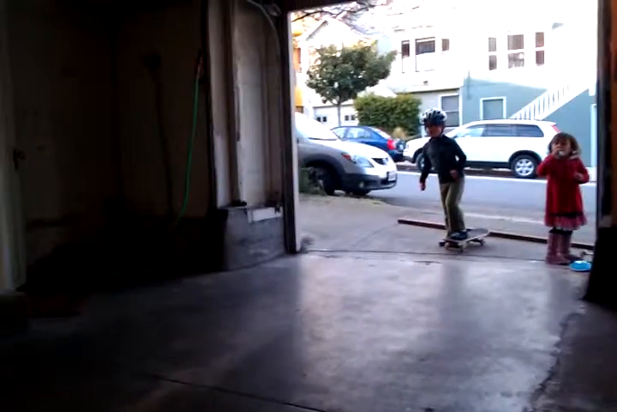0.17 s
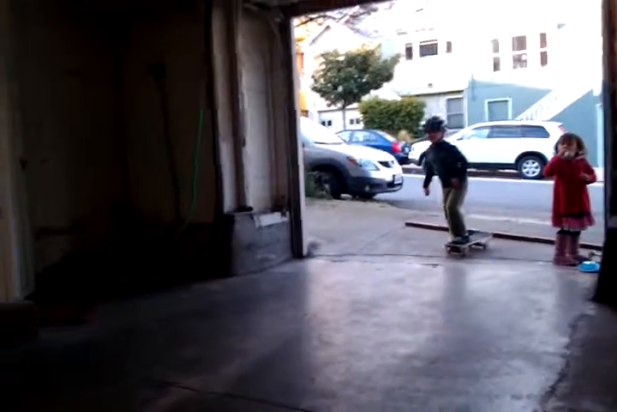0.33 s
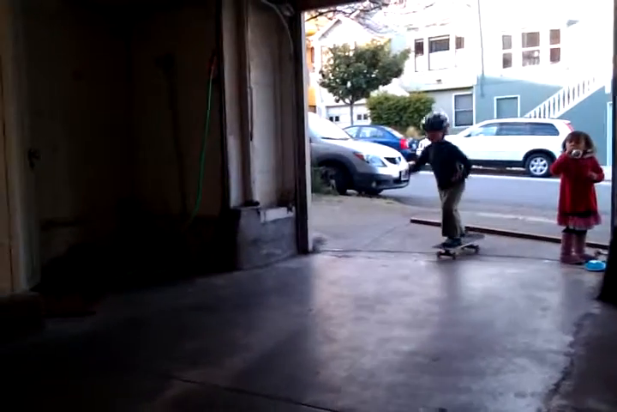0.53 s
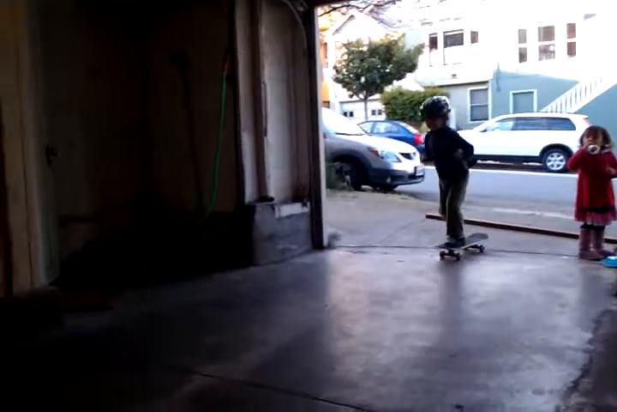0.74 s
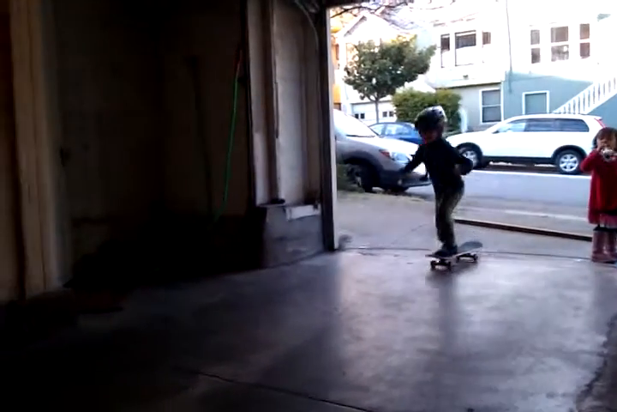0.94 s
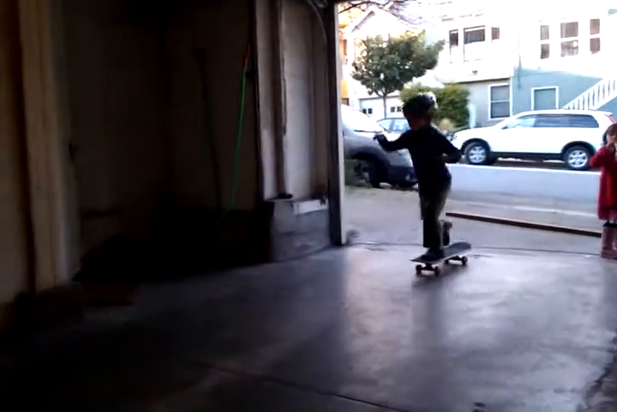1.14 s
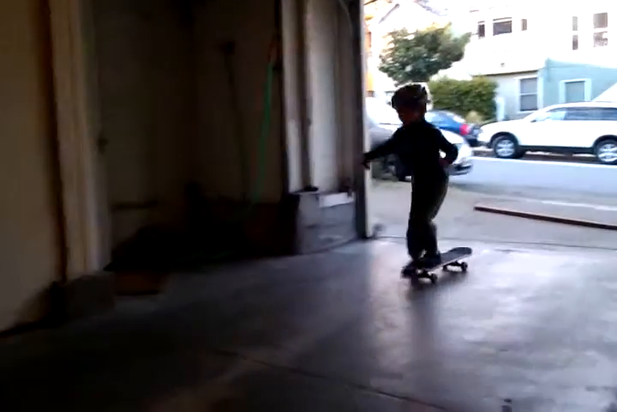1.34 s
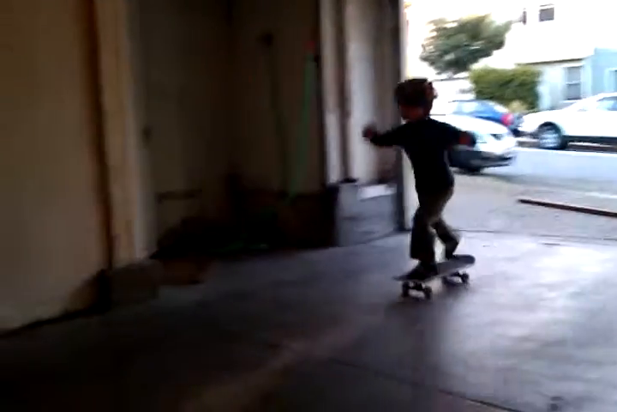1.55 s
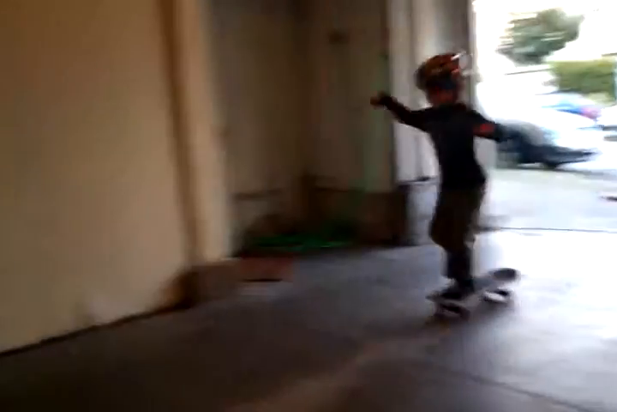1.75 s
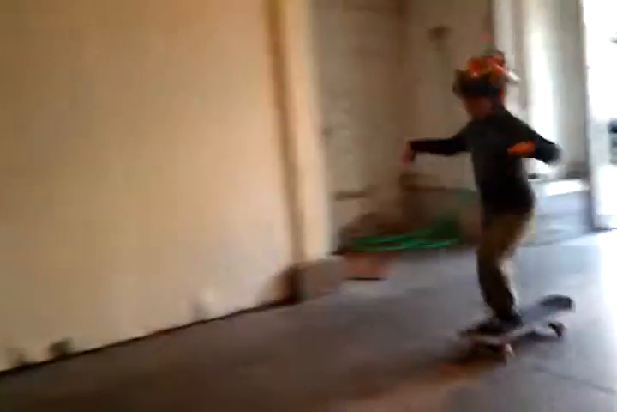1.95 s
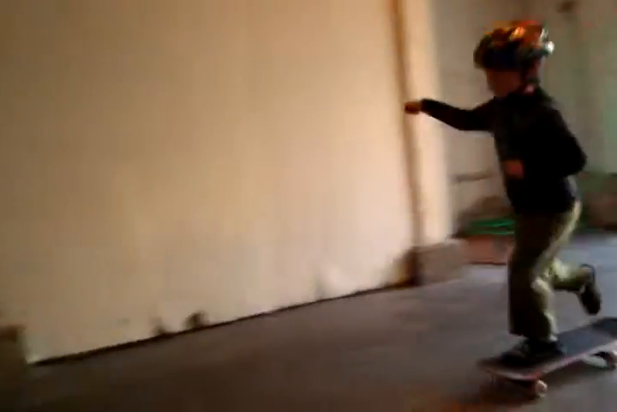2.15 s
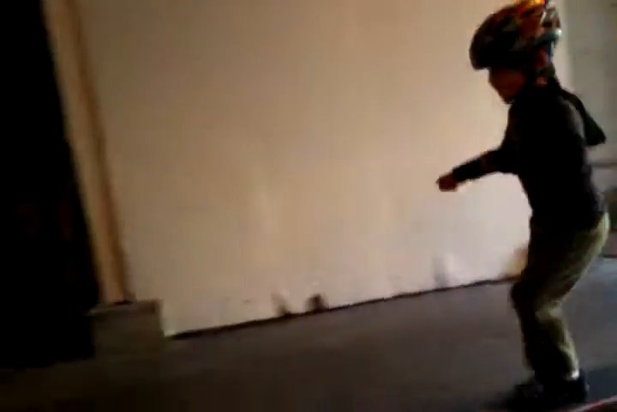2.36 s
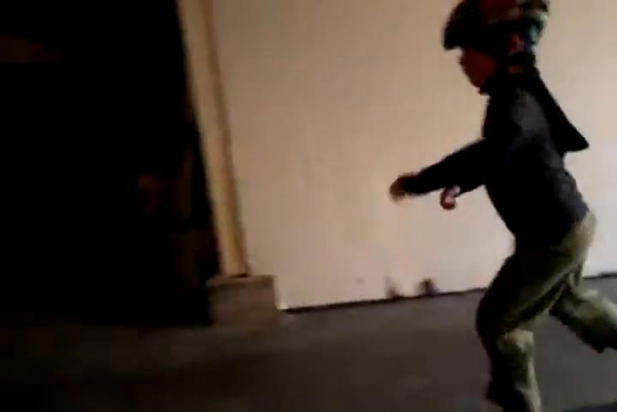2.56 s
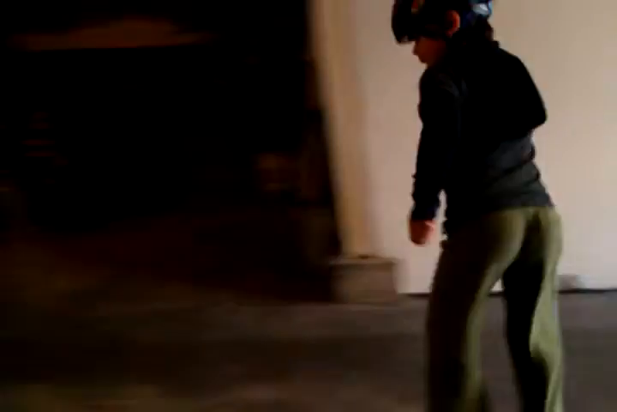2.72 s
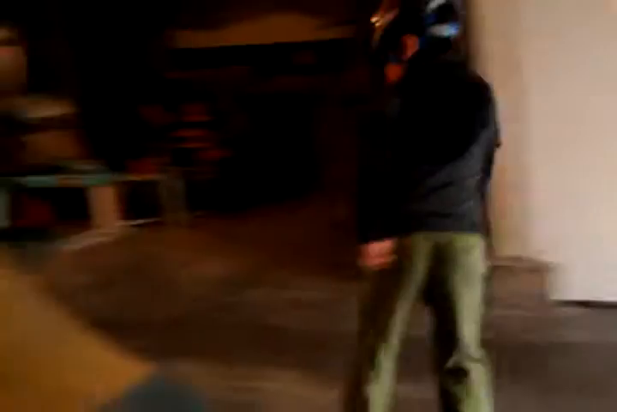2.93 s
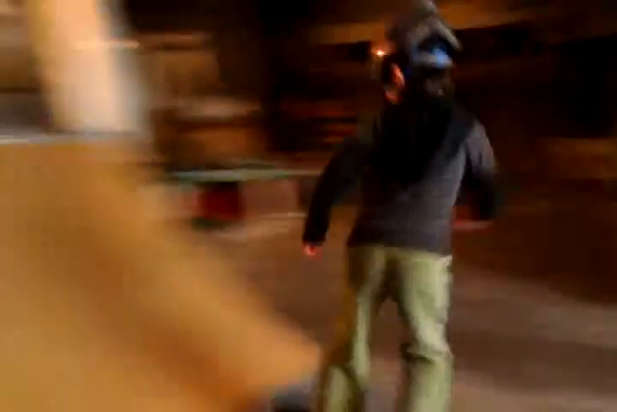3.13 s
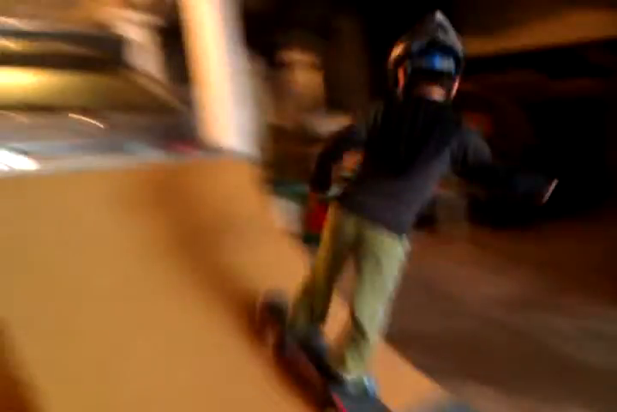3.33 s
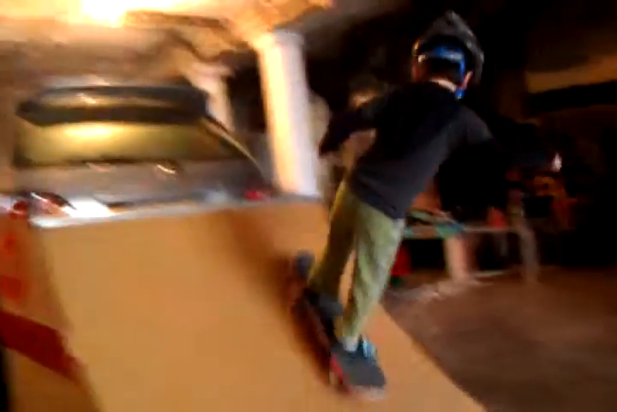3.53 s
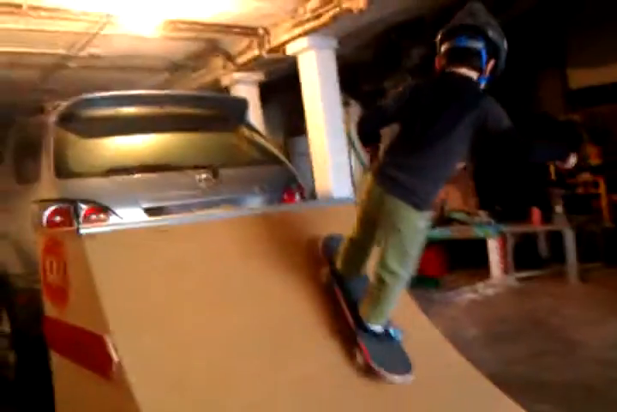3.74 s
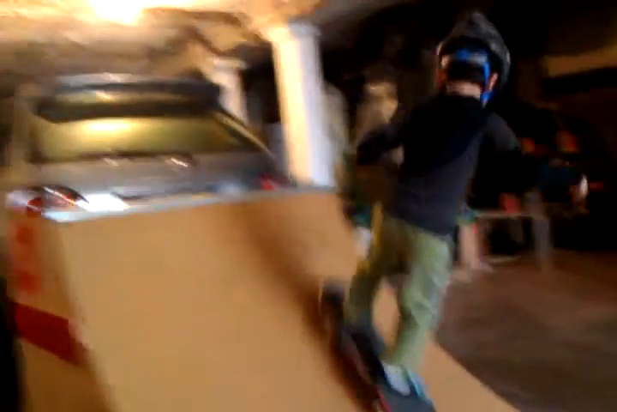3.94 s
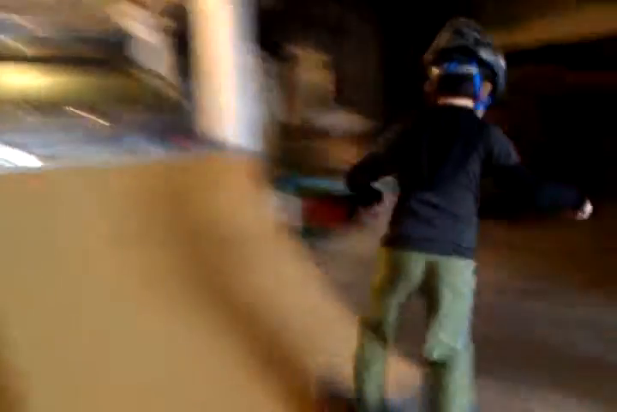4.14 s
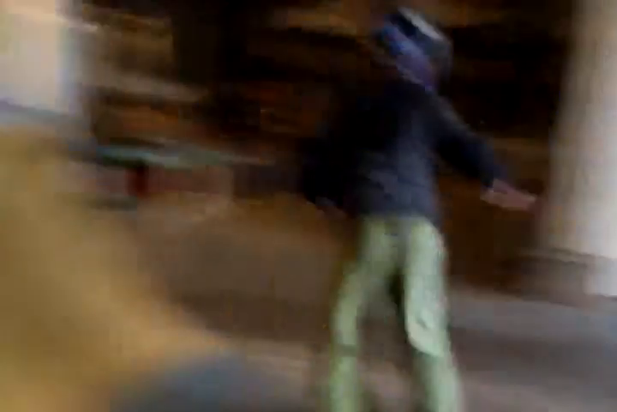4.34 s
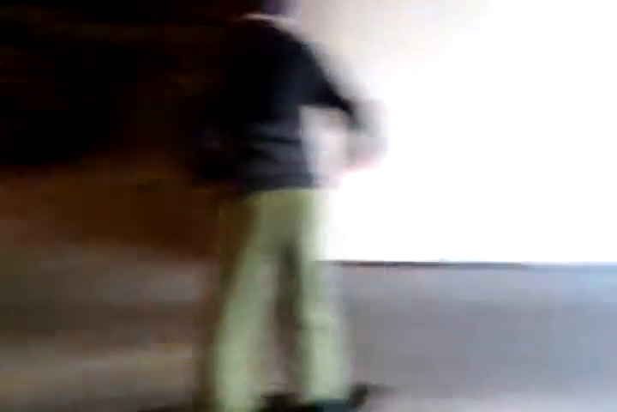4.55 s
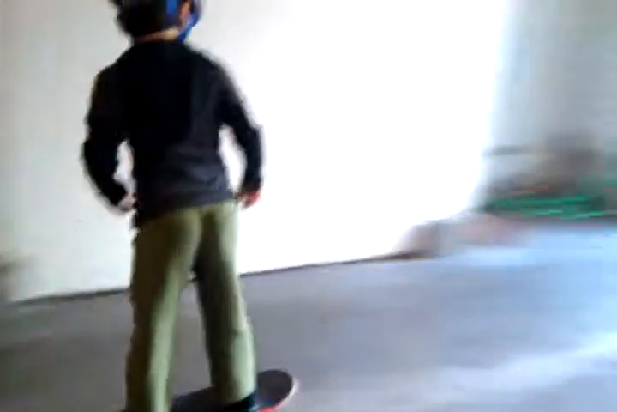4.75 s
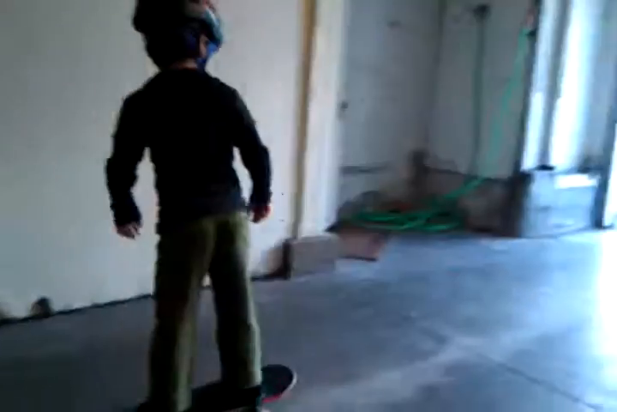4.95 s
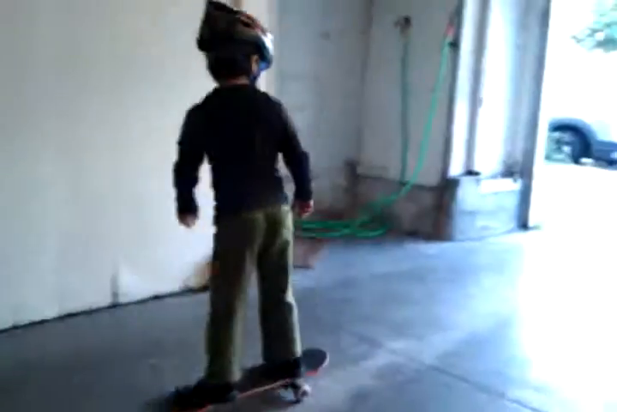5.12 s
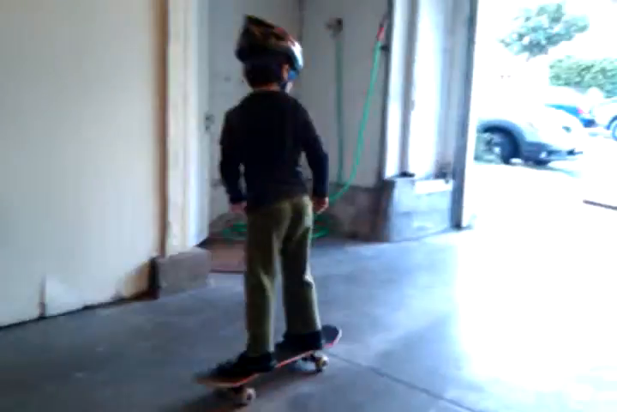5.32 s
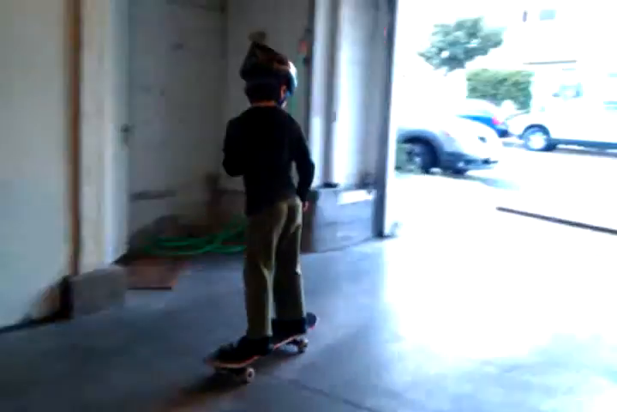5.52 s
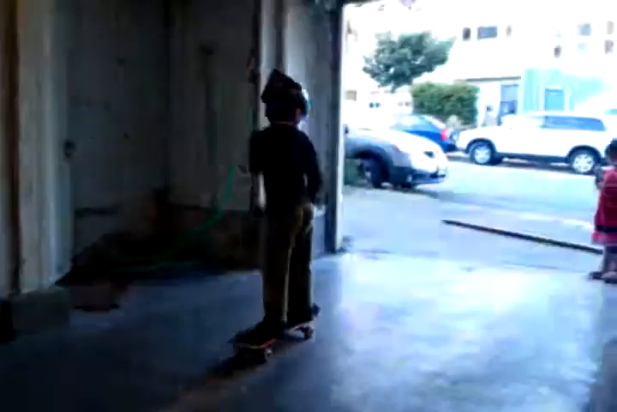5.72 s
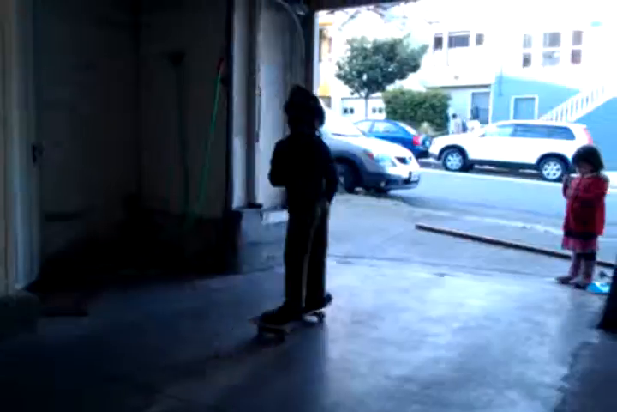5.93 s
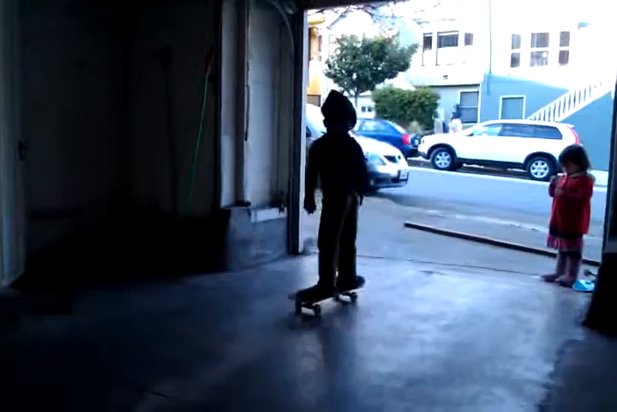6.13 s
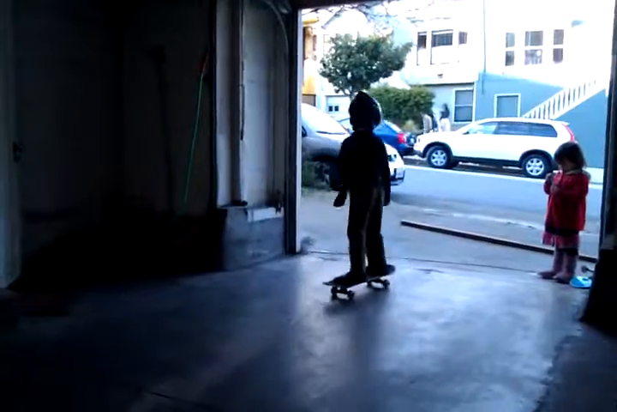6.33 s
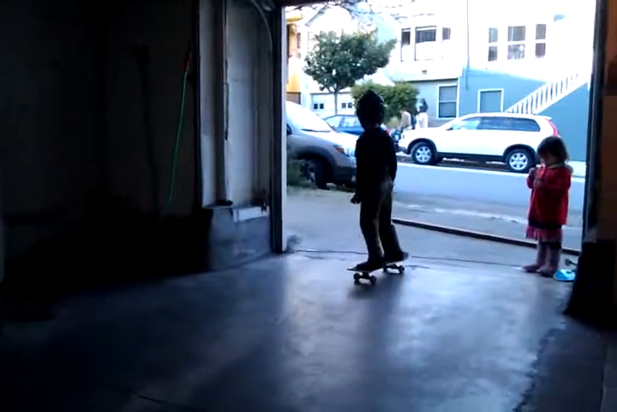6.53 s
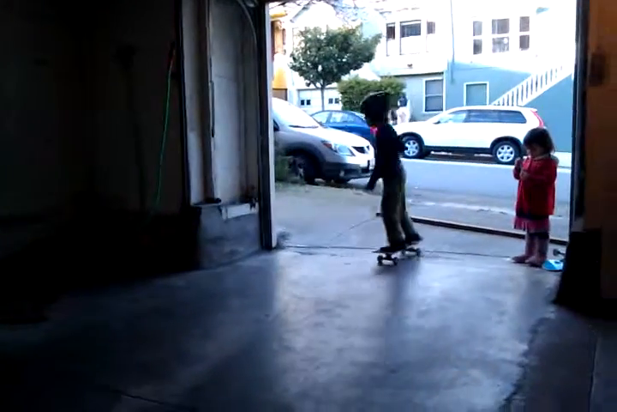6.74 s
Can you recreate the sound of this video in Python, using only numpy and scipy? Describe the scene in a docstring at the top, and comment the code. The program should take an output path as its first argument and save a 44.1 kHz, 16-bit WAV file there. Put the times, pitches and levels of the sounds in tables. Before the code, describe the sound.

In an echoing concrete garage open to a quiet street, a skateboard approaches with soft ticks that grow into hard knocks and gritty rolling. It hits a hollow plywood ramp in a very loud, distorted burst of bangs, pauses, clatters back down, then rolls away with scattered clacks. Narrow, phone-like microphone that overloads.

```python
"""Soft knocks over a low street murmur, then a child's skateboard rolls over rough concrete in a garage,
past a phone, up a plywood ramp that clatters twice, and back out.
Random grit excites the resonances of deck, trucks and the air under the board; short bursts make the
cracks knock. Chatter and slams drive the ramp's wood modes and its metal lip. A tanh overload, a
telephone band and hard clipping end the chain."""
import sys
import numpy as np
from scipy import signal
from scipy.io import wavfile
from scipy.ndimage import uniform_filter1d

SR = 44100
rng = np.random.default_rng(int(sys.argv[2]) if len(sys.argv) > 2 else 0)


def pcm_store(signal):
    """Save signal as 16-bit PCM."""
    levels = np.round(np.clip(np.atleast_2d(signal), -1, 1) * 32767)
    wavfile.write(sys.argv[1], SR, levels.astype(np.int16).T)


N = 298998  # length in samples


def gain_of(db):
    """Decibel law: an amplitude ratio is 10 to the power dB / 20."""
    return 10 ** (np.asarray(db) / 20)


def evened(x):
    """Normalisation: scales a signal to an rms of 1."""
    return x / np.sqrt(np.mean(x ** 2) + 1e-20)


def add(mix, start_s, sound):
    """Superposition: sums a sound into the mix in place, cut at the end of the mix."""
    part = mix[round(start_s * SR):][:len(sound)]
    part += sound[:len(part)]


def colour(x, points):
    """Minimum-phase filtering: the log gain fixes the phase, so the response starts at once."""
    table_hz, db = np.transpose(points)
    hz = abs(np.fft.fftfreq(8192, 1 / SR))
    level_db = np.interp(np.log(hz + 1), np.log(table_hz + 1), db, left=min(db[0], -24))
    log_gain = level_db * np.log(10) / 20
    response = np.exp(np.conj(signal.hilbert(log_gain)))
    taps = np.fft.ifft(response).real[:4096]
    return signal.oaconvolve(x, taps)[:len(x)]


def resonate(x, hz, width_hz):
    """Heterodyned resonance: shifts hz down to zero, smooths, and shifts back, with a peak gain of 1."""
    turn = np.exp(2j * np.pi * hz * np.arange(len(x)) / SR)
    r = np.exp(-np.pi * width_hz / SR)
    smooth = signal.lfilter([1 - r], [1, -r], x / turn)
    return 2 * (turn * smooth).real


def ring(x, modes, centre_hz, spread):
    """Modal superposition: a panel's modes near centre_hz speak most, as a blow lands at one spot."""
    out = np.zeros(len(x))
    for k, (hz, width_hz, db) in enumerate(modes):
        r = np.exp(-np.pi * width_hz / SR)
        near = np.exp(-(np.log(hz / centre_hz) / spread) ** 2)
        mode = signal.lfilter([1 - r], [1, -r * np.exp(2j * np.pi * hz / SR)], x).real
        out += (-1) ** k * near * gain_of(db) * 2 * mode  # signs alternate from mode to mode
    return out


def grit(count, per_s, spread_db):
    """Shot noise: random clicks of uneven size, as wheels meet grains of stone."""
    size_db = spread_db * np.minimum(rng.exponential(1, count), 5)
    size = gain_of(size_db) * rng.choice([-1., 1.], count)
    return evened(size * (rng.random(count) < per_s / SR))


def lumps(count, lasts_s, depth_db):
    """Random amplitude modulation: twice-smoothed noise moves the level over about lasts_s."""
    width = round(lasts_s * SR)
    slow = uniform_filter1d(uniform_filter1d(rng.standard_normal(count), width), width)
    return gain_of(depth_db * evened(slow))


# spectrum of the street noise: pitch_hz, relative density_db (per Hz)
STREET = [(18, -51), (30, -41), (154, -23), (285, -8.5), (329, -24.5), (647, -19.5), (1350, -20),
          (1470, -16), (4000, -43.5), (5200, -56.5), (8800, -120)]
# spectrum of floor-borne bass, also under the board and ramp: pitch_hz, relative density_db (per Hz)
RUMBLE = [(20, -1.5), (60, 4.5), (120, 12.5), (200, -11.5), (400, -41.5)]


def street():
    """Stationary noise: the street through the open door, with bass borne by the floor."""
    air, floor = rng.standard_normal((2, N))
    return gain_of(-61.5) * evened(colour(air, STREET)) + gain_of(-55.0) * evened(colour(floor, RUMBLE))


# reverberation time of the garage: pitch_hz, t60_s
GARAGE_DECAY = [(100, 0.47), (400, 0.31), (1500, 0.66), (3500, 0.5)]


def garage(x):
    """Reverberation: sparse taps of random sign, each band decaying 60 dB in its own t60."""
    taps = np.zeros(SR)
    at = np.arange(260, SR - 20, 20)  # in samples; one tap falls somewhere in each slot of 20
    taps[at + rng.integers(0, 20, len(at))] = rng.choice([-1., 1.], len(at))
    hz, t, bands = signal.stft(taps, SR, nperseg=256)
    table_hz, table_t60_s = np.transpose(GARAGE_DECAY)
    t60_s = np.interp(hz, table_hz, table_t60_s)[:, None]
    tail = signal.istft(bands * gain_of(-60 * t / t60_s), SR, nperseg=256)[1]
    return signal.oaconvolve(x, tail / np.linalg.norm(tail))[:N]


# the bearing's squeak: start_s, length_s, level_db, pitch_hz
SQUEAKS = [(1.290, 0.3, -53.5, 3020)]
SQUEAK_RISE_S, SQUEAK_FALL_S = 0.076, 0.1


def squeak():
    """Narrow-band excitation: rubbing grit in a dry bearing whistles, swells, holds and stops."""
    start_s, length_s, level_db, pitch_hz = SQUEAKS[0]
    t = np.arange(0, length_s, 1 / SR)
    rub = grit(len(t), per_s=3400, spread_db=2.5)
    whistle = evened(resonate(rub, pitch_hz, 86))
    hiss = evened(resonate(rub, pitch_hz, 560))
    swell = np.clip(np.minimum(t / SQUEAK_RISE_S, (length_s - t) / SQUEAK_FALL_S), 0, 1) ** 2
    out = np.zeros(N)
    add(out, start_s, gain_of(level_db) * swell * (whistle + 1.14 * hiss))
    return out


# wheels over cracks: start_s, truck click_db, deck blow_db, click_hz, deck_hz,
# rattle after it rattle_db, shaking lasts_s, low thud_db
KNOCKS = [(0.093, -41, -55, 1480, 904, -44, 0.15, -60), (0.3105, -44, -45, 3160, 479, -46, 0.039, -56),
          (0.451, -41, -38, 1210, 361, -43, 0.1, -52), (0.739, -37, -51, 1730, 463, -50, 0.053, -59),
          (0.768, -42, -44, 1870, 479, -46, 0.043, -51), (0.874, -55, -40, 2040, 463, -56, 0.06, -48),
          (0.8985, -34.5, -48, 1750, 447, -46, 0.18, -45), (1.0069, -40, -33, 1810, 468, -50, 0.09, -47),
          (1.2734, -44.5, -57, 1720, 576, -47.5, 0.08, -63),
          (1.3854, -32, -35.5, 2990, 606, -43, 0.13, -47), (1.4717, -34, -37, 3090, 616, -54, 0.038, -56),
          (1.6723, -33.5, -45, 1730, 649, -37, 0.038, -54),
          (1.892, -29.5, -38, 2910, 641, -44.5, 0.11, -50), (1.9525, -30, -29.5, 2200, 450, -39, 0.14, -38),
          (2.0246, -29.5, -23.5, 1200, 423, -37.5, 0.058, -31),
          (2.154, -17.5, -16, 2730, 536, -29, 0.048, -36), (2.1884, -41, -18, 3170, 528, -43, 0.029, -34),
          (2.3597, -25.5, -36.5, 2700, 686, -37, 0.078, -47),
          (2.4033, -32, -31.5, 2320, 536, -32.5, 0.06, -48),
          (2.453, -29.5, -30, 2650, 511, -32.5, 0.043, -41),
          (2.6128, -28.5, -29, 2600, 519, -33, 0.064, -47.5),
          (2.7006, -27, -33, 2520, 923, -37.5, 0.054, -41),
          (2.7383, -22.5, -22.5, 1990, 705, -29, 0.11, -37),
          (2.7721, -22, -18.5, 2330, 444, -31, 0.035, -31.5),
          (2.7967, -34, -20, 2980, 528, -35, 0.058, -39.5), (2.925, -33, -23.5, 2470, 444, -46, 0.045, -40),
          (3.0484, -25.5, -23, 2650, 751, -34, 0.045, -32),
          (3.828, -36.5, -50, 2420, 226, -45.5, 0.071, -44),
          (3.96, -44.5, -35.5, 1210, 633, -48, 0.051, -26),
          (3.9905, -38.5, -21, 1960, 256, -45, 0.06, -26.5),
          (4.0376, -33.5, -22.5, 2620, 242, -37.5, 0.076, -24.5),
          (4.525, -30.5, -24.5, 1760, 474, -36, 0.069, -35), (4.689, -37, -50, 2800, 703, -46, 0.066, -46),
          (4.7363, -42, -34.5, 3220, 498, -57, 0.057, -48), (4.9648, -38, -22, 1270, 598, -54, 0.029, -35),
          (4.9834, -44, -25, 1310, 406, -45.5, 0.069, -31.5),
          (5.0624, -36, -36.5, 1350, 205, -46.5, 0.077, -42),
          (5.164, -38.5, -59.5, 1470, 441, -40.5, 0.094, -52),
          (5.216, -36, -31.5, 2470, 223, -45, 0.06, -39), (5.2636, -31.5, -45, 2500, 476, -47, 0.029, -46),
          (5.393, -34.5, -27, 2190, 466, -44.5, 0.056, -37),
          (5.456, -24.5, -20.5, 1750, 441, -38, 0.045, -28), (5.573, -31, -51, 1200, 479, -37, 0.09, -52.5),
          (5.6266, -30.5, -23.5, 1940, 221, -34, 0.047, -28),
          (5.7723, -29.5, -53, 2620, 662, -39.5, 0.06, -50), (5.84, -30, -39, 1710, 875, -39, 0.12, -51),
          (5.884, -41, -35, 2490, 896, -39, 0.047, -44), (5.933, -34, -38.5, 1810, 452, -41, 0.04, -48),
          (6.2861, -29, -35.5, 3140, 950, -37, 0.12, -56), (6.311, -32, -35.5, 2780, 603, -40.5, 0.14, -60),
          (6.4228, -31.5, -50, 1990, 1010, -45, 0.074, -54), (6.486, -36, -34, 1740, 810, -45, 0.039, -56),
          (6.6827, -45, -34, 1300, 794, -46, 0.084, -43), (6.7111, -32.5, -32, 1720, 767, -43, 0.14, -44)]
# modes of the deck: pitch_hz, width_hz, level_db
DECK = [(225, 30.6, 5), (316, 84, -4.5), (386.5, 66, -2), (454, 21.8, 1.5), (512.3, 12, -2),
        (631, 76, -5.5), (710, 27, -5), (788.6, 48.6, -9), (935.6, 36, -8.5), (1016, 36, -8),
        (1278, 570, -21.5)]
# spectrum of the metal trucks: pitch_hz, relative density_db (per Hz)
TRUCKS = [(500, -14), (900, 2), (1150, 3.5), (1400, -6.5), (1750, -1), (2100, -3), (2700, -2.5), (3200, -3),
          (4500, -6.5)]
CLICK_S = 0.012  # decay time of the truck click
JOLT_SHARE = 0.46  # the jolt's decay time as a share of the shaking time


def knocks():
    """Impact excitation: the truck clicks first; the deck is jolted 2 ms later and rings."""
    out, t = np.zeros(N), np.arange(round(.2 * SR)) / SR
    since = np.array([t, t - .002])  # time since the click and since the jolt
    thud = ring(np.exp(-((t - .004) / 0.00065) ** 2), DECK, 260, spread=0.7)
    for start_s, click_db, blow_db, click_hz, deck_hz, _, lasts_s, thud_db in KNOCKS:
        decay_s = np.array([[CLICK_S], [JOLT_SHARE * lasts_s]])
        snap, push = rng.standard_normal((2, len(t))) * np.exp(-since / decay_s) * (since >= 0)
        push += 4 * np.exp(-((since[1] - .0004) / .0001) ** 2)  # the first contact is one sharp blow
        click = resonate(resonate(snap, click_hz, 690), click_hz, 690) + 0.55 * colour(snap, TRUCKS)
        blow = ring(push, DECK, deck_hz, spread=0.26) + gain_of(-18.5) * colour(push, RUMBLE)
        for level_db, sound in (thud_db, thud), (click_db, click), (blow_db, blow):
            add(out, start_s, gain_of(level_db) * sound / abs(sound).max())
    return out


# the ramp's foot is crossed: start_s, rise_s, hold_s (after start_s), hollow boom_db,
# plywood skin_db, metal lip_db
RAMP = [(3.168, 0.0032, 0.24, 6.5, 6, -10.5), (4.056, 0.024, 0.2, 0.5, 4, -18.5)]
# axles slam the lip: start_s, lip_db, plywood skin_db, hollow boom_db
SLAMS = [(3.1742, 1.5, 13.5, 8), (3.182, 3, 14.5, 7), (3.1998, -13, 22.5, 0), (3.2494, -30, 19, 16),
         (3.274, -0.5, 12, 9.5), (3.299, -0.5, 5, 23.5), (3.3294, -12, 21, 10.5), (3.352, -11, 9.5, 11),
         (3.3719, -1.5, 15, 9.5), (3.392, -9.5, 14, 13.5), (3.408, -9, 10, 15), (4.071, -22, 9.5, 2),
         (4.0862, -5.5, 14.5, 11), (4.1018, -24, 15.5, 14), (4.137, -9.5, 12.5, -4.5),
         (4.1846, -18, 11.5, -4), (4.2394, -15.5, 6.5, 2)]
# modes of the plywood: pitch_hz, width_hz, level_db
PLYWOOD = [(130, 12, -10.5), (210.7, 23.6, 4), (250.5, 29, 2), (289.2, 17.6, 1.5), (315.2, 14.8, -0.5),
           (343, 82, -4.5), (476.3, 51.5, -3), (539.6, 31.3, -3.5), (613, 55, -3.5), (741.5, 42, -6.5),
           (821, 87, -9.5), (990, 190, -12.5), (1018.6, 27, -7)]
# spectrum of the metal lip: pitch_hz, relative density_db (per Hz)
LIP = [(700, -43), (1100, 4), (1400, -1), (1560, 1.5), (2000, -4), (2420, -1.5), (3120, -2.5), (4500, -4)]
WOOD_FADE_DB_PER_S, LIP_FADE_DB_PER_S = 126.5, 229.5
SLAM_S = 0.012  # decay time of a slam


def ramp():
    """Forced panel vibration: the loose lip chatters and drums the hollow plywood; axles slam it."""
    boom, skin, clank = np.zeros((3, N))
    t = np.arange(round(.6 * SR)) / SR
    for start_s, rise_s, hold_s, boom_db, skin_db, lip_db in RAMP:
        chatter = grit(len(t), per_s=4000, spread_db=0.67) * np.minimum(1, t / rise_s) ** 2
        after = np.maximum(t - hold_s, 0)
        add(boom, start_s, chatter * gain_of(boom_db - WOOD_FADE_DB_PER_S * after))
        add(skin, start_s, chatter * gain_of(skin_db - WOOD_FADE_DB_PER_S * after))
        add(clank, start_s, chatter * gain_of(lip_db - LIP_FADE_DB_PER_S * after))
    t = np.arange(round(.1 * SR)) / SR
    for start_s, lip_db, skin_db, boom_db in SLAMS:
        crack = rng.standard_normal(len(t)) * np.exp(-t / SLAM_S)
        add(clank, start_s, gain_of(lip_db) * crack)
        add(skin, start_s, gain_of(skin_db) * crack)
        add(boom, start_s, gain_of(boom_db) * crack)
    low = ring(boom, PLYWOOD, 290, spread=0.7) + gain_of(-4.0) * colour(boom, RUMBLE)
    return low + ring(skin, PLYWOOD, 720, spread=0.96) + colour(clank, LIP)


SHAKE_RISE_S = 0.0096


def shaken(times_s, levels_db, fades_s):
    """Energy addition: each knock's level swells quickly and dies away, and their powers sum."""
    power, t = np.zeros(N), np.arange(SR // 2) / SR
    for start_s, level_db, fade_s in zip(times_s, levels_db, fades_s):
        shape = np.minimum(t / SHAKE_RISE_S, 1) * np.exp(-t / max(fade_s, .01))
        add(power, start_s, (gain_of(level_db) * shape) ** 2)
    return np.sqrt(power)


# one list a stretch of rolling: start_s, deck buzz_db, deck flex_db, hollow drone_db, truck rattle_db
ROLL = [
    [(0.0, -63, -64, -77, -62), (0.89, -44, -54.5, -55, -51), (1.17, -60, -66, -62, -69),
     (1.39, -54.5, -62, -65, -50), (1.54, -51.5, -54.5, -53, -44.5), (1.89, -49, -51, -63, -54.5),
     (2.12, -49, -57, -49.5, -44.5), (2.39, -41.5, -50.5, -42.5, -51.5), (2.76, -43.5, -49, -46, -41),
     (2.99, -48.5, -44.5, -29.5, -50.5), (3.15, -36.5, -38, -33.5, -40)],
    [(3.76, -54, -48.5, -63, -56.5), (3.94, -39.5, -37.5, -42, -50), (4.05, -43, -39, -42, -48.5)],
    [(4.45, -38.5, -54, -42, -42.5), (4.75, -50, -52.5, -42, -53), (5.07, -54, -47, -51, -66),
     (5.57, -44, -55, -39.5, -40.5), (5.73, -46.5, -61, -52.5, -55.5), (5.98, -50.5, -50, -64, -54),
     (6.22, -51.5, -57, -53, -52.5), (6.52, -50.5, -66, -66, -55), (6.78, -45, -46, -48, -47)],
]
# air under the deck: pitch_hz, width_hz
HOLLOW = 486, 40.5
SPOT_DB = 4.5  # buzz gained and flexing lost after a knock, per octave of deck pitch
AFTER_BUZZ_DB, AFTER_FLEX_DB = -8.5, -17.5  # shaking after a knock, relative to its blow
TILT_DB = 3  # the rattle's tilt toward high parts rises by this for each octave of click pitch


def rolling():
    """Forced resonance: grit shakes deck, floor and loose trucks; knocks leave them shaking harder."""
    t = np.arange(N) / SR
    start_s, *columns = np.transpose(np.concatenate(ROLL))
    buzz_db, flex_db, drone_db, trucks_db = (np.interp(t, start_s, c) for c in columns)
    at_s, _, blow_db, click_hz, deck_hz, rattle_db, lasts_s, _ = np.transpose(KNOCKS)
    spot_db = SPOT_DB * np.log2(deck_hz / 500)

    road = grit(N, per_s=1500, spread_db=1) * lumps(N, lasts_s=0.037, depth_db=2.0)
    flex = evened(ring(road, DECK, 278, spread=0.44)) + gain_of(6.5) * evened(colour(road, RUMBLE))
    buzz = evened(ring(road, DECK, 701, spread=0.64))
    drone = evened(resonate(resonate(road, *HOLLOW), *HOLLOW))
    flex *= np.hypot(gain_of(flex_db), shaken(at_s, blow_db + AFTER_FLEX_DB - spot_db, lasts_s))
    buzz *= np.hypot(gain_of(buzz_db), shaken(at_s, blow_db + AFTER_BUZZ_DB + spot_db, lasts_s))

    loose = np.hypot(gain_of(trucks_db), shaken(at_s, rattle_db, lasts_s))
    latest_knock = np.searchsorted(at_s[1:], t)
    tilt_db = TILT_DB * np.log2(click_hz / 2200)[latest_knock]
    rattle = np.zeros(N)
    for step in (-1, -.5, 0, .5, 1):  # five loose parts, low to high; each comes and goes
        part = grit(N, per_s=3600, spread_db=1.0) * lumps(N, lasts_s=.015, depth_db=2.5)
        part_hz = 2000 * 2 ** (0.69 * step)
        rattle += gain_of(tilt_db * step) * loose * resonate(part, part_hz, 0.34 * part_hz)
    return flex + buzz + gain_of(drone_db) * drone + colour(rattle, TRUCKS)


def scene():
    """Direct sound plus reverberation: board and ramp in the garage, with the street outside."""
    board = rolling() + knocks() + squeak()
    wood = ramp()
    echoes = garage(gain_of(-10.5) * board + gain_of(-7.5) * wood)
    return (board + wood + echoes + street())[None]


# response of the telephone band: pitch_hz, gain_db
PHONE = [(150, -12), (200, -0.5), (3200, 2.5), (3500, -4.5), (3900, -13), (4300, -23), (4700, -87.5),
         (5200, -110)]
OVERLOAD, CEILING = 1, .715  # amplitudes where the microphone saturates and the output clips
EDGE_HZ = 15900  # band limit


def record(dry):
    """Nonlinear distortion: the microphone saturates, then telephone band, hard clipping, band limit."""
    squeezed = OVERLOAD * np.tanh(dry[0] / OVERLOAD)
    narrow = colour(squeezed, PHONE)
    clipped = np.clip(narrow, -CEILING, CEILING)
    low_pass = signal.firwin(511, EDGE_HZ, window=("kaiser", 9), fs=SR)
    return signal.oaconvolve(clipped, low_pass, "same")[None]


dry = scene()
out = record(dry)
pcm_store(out)
```